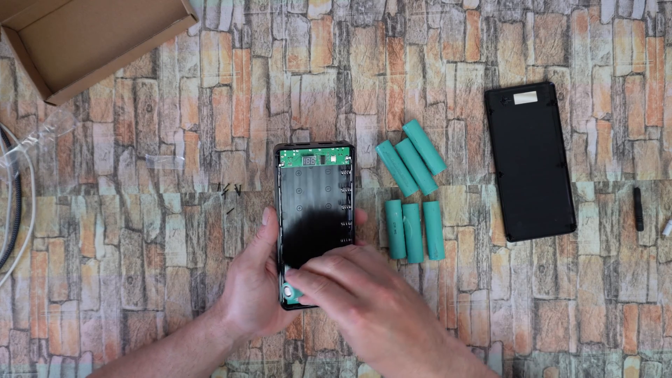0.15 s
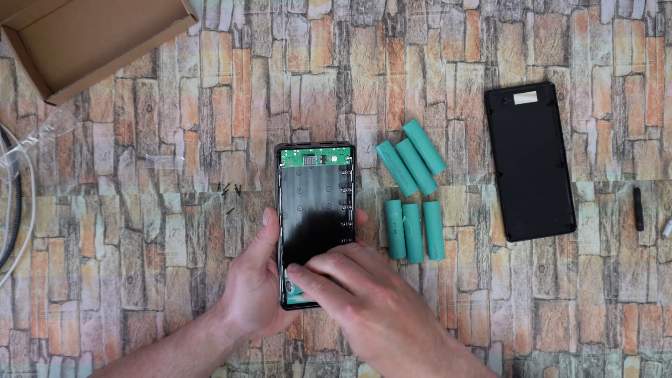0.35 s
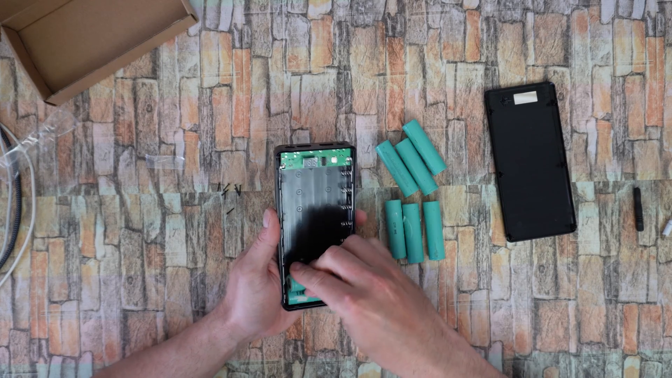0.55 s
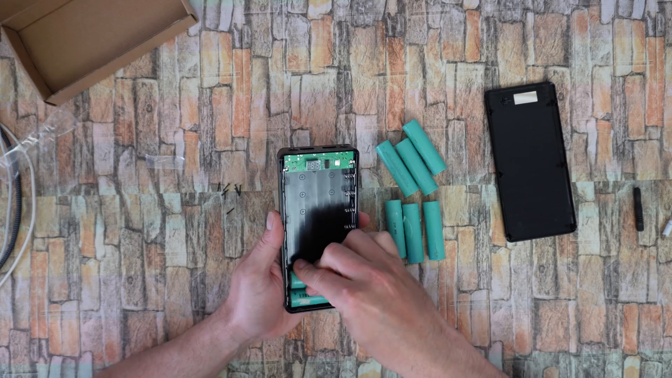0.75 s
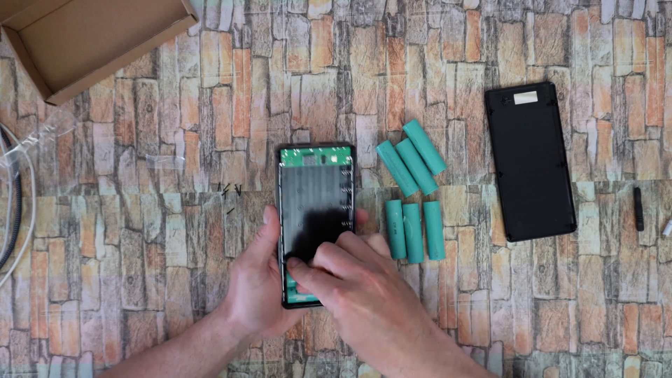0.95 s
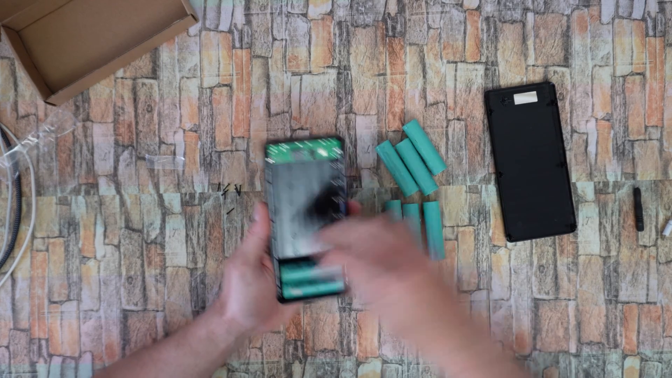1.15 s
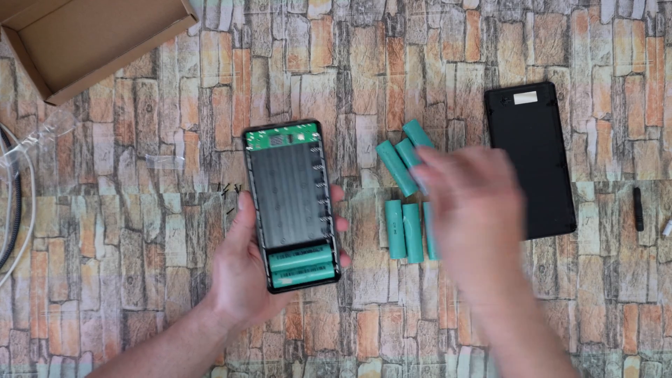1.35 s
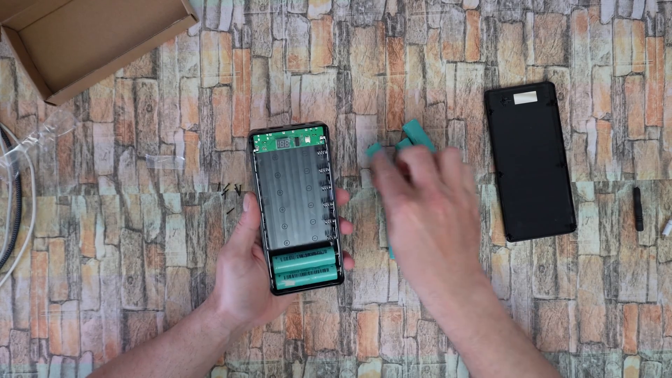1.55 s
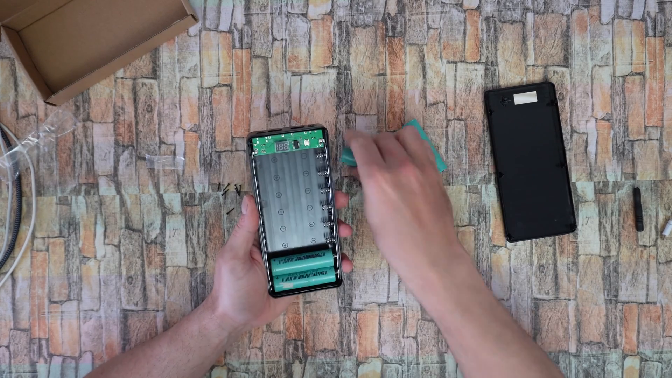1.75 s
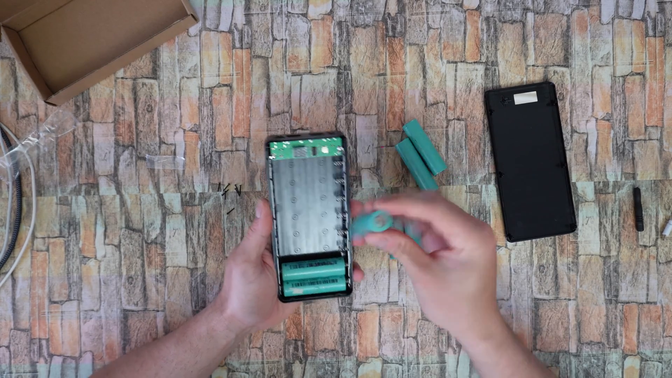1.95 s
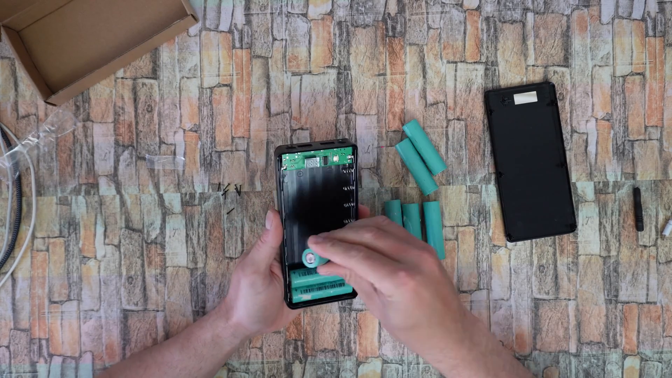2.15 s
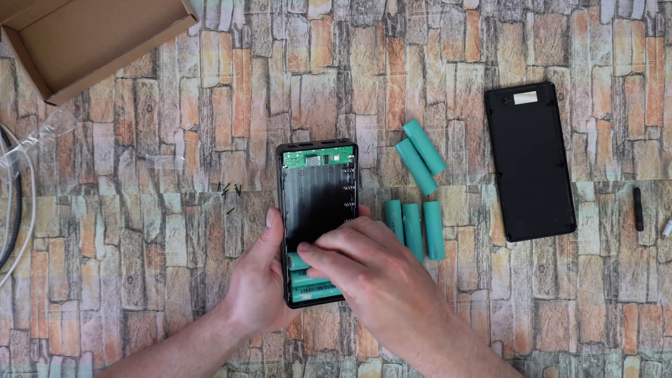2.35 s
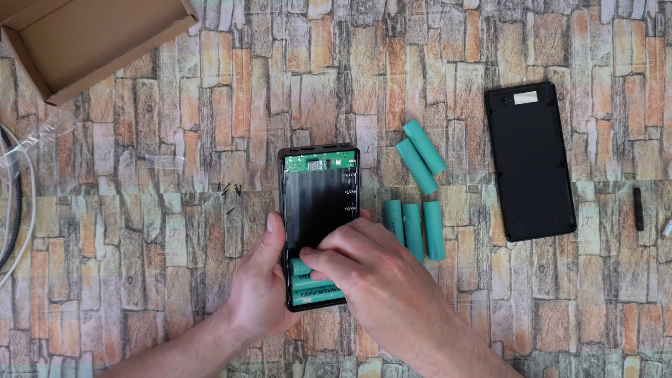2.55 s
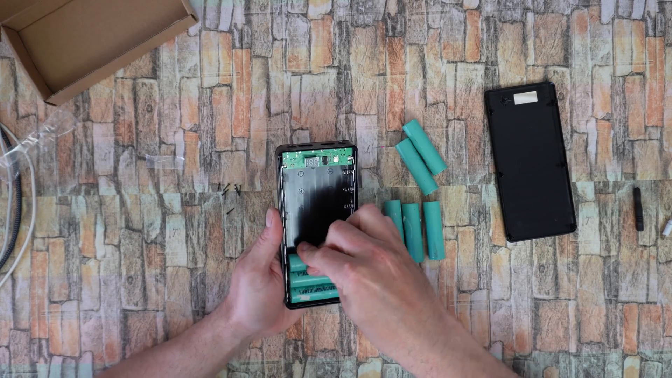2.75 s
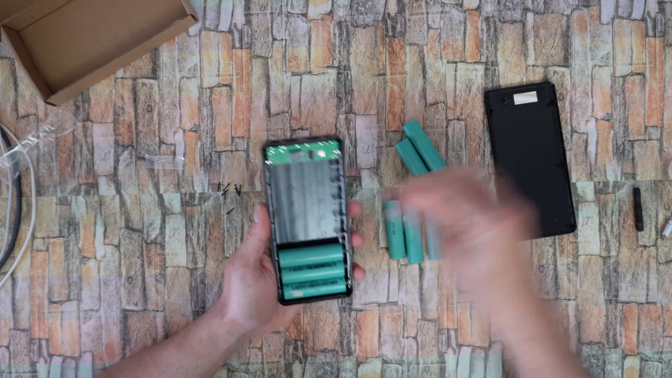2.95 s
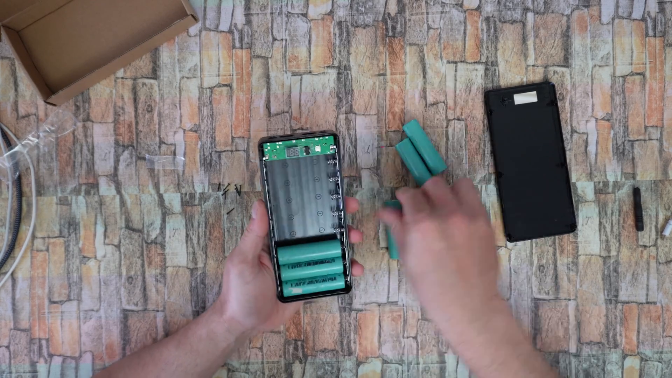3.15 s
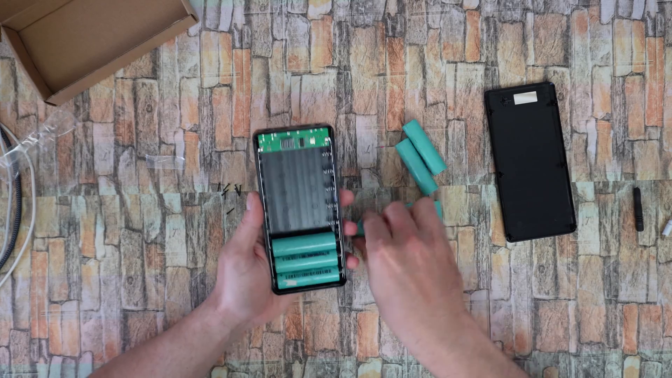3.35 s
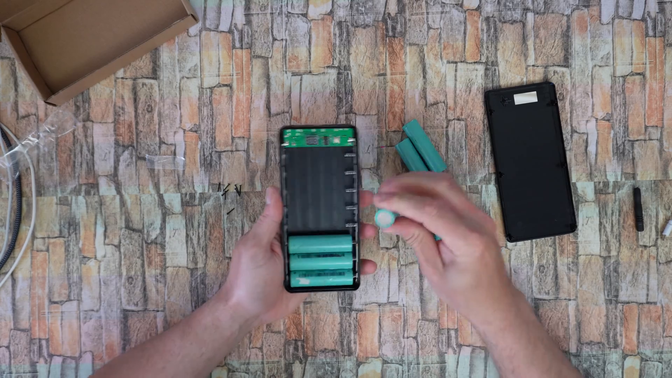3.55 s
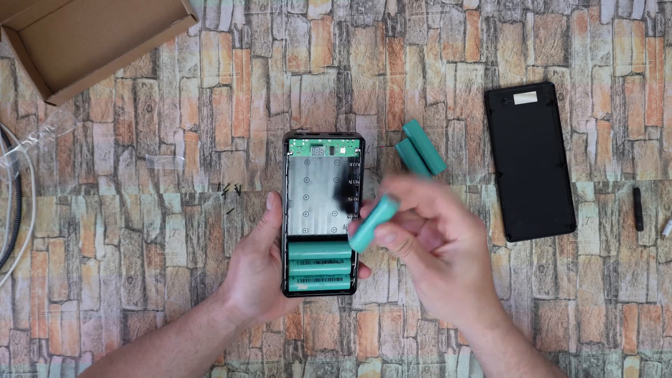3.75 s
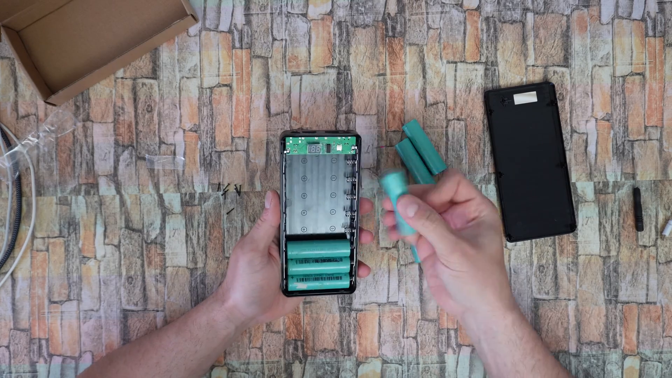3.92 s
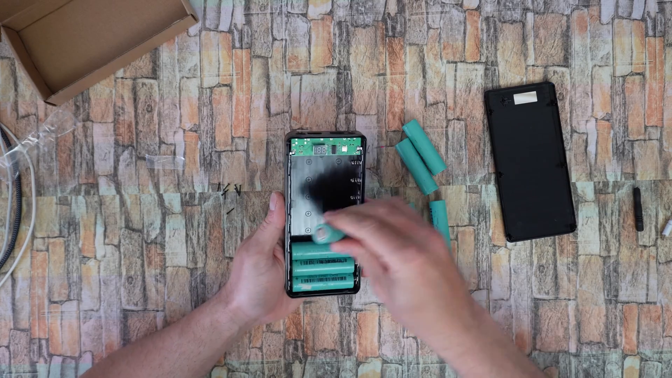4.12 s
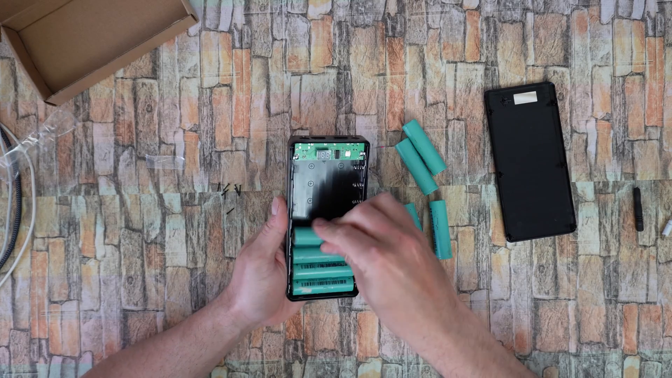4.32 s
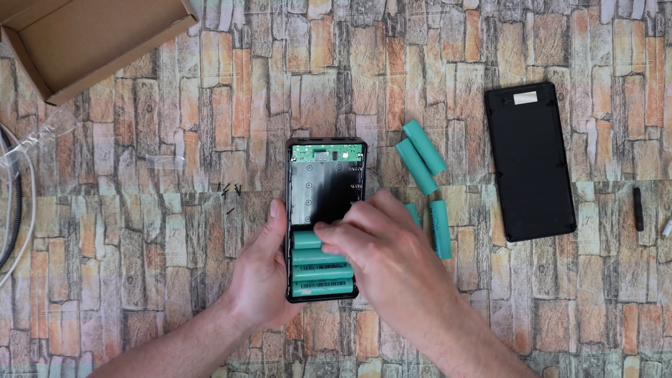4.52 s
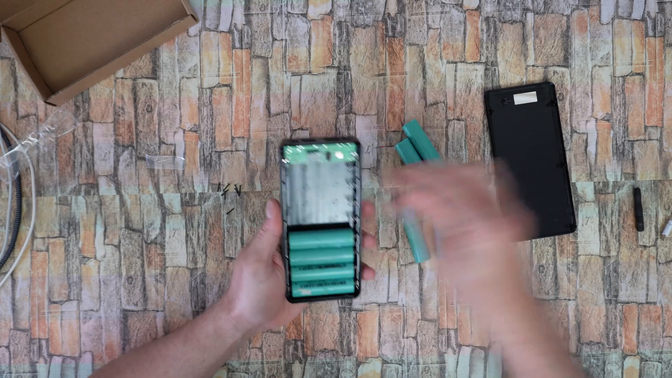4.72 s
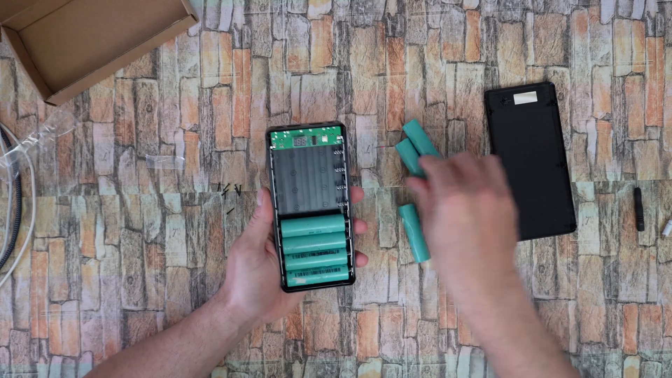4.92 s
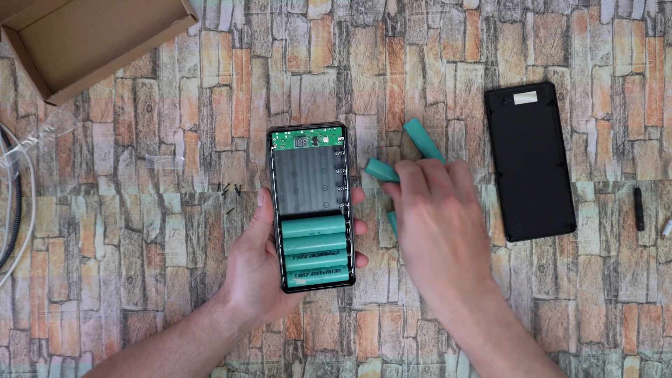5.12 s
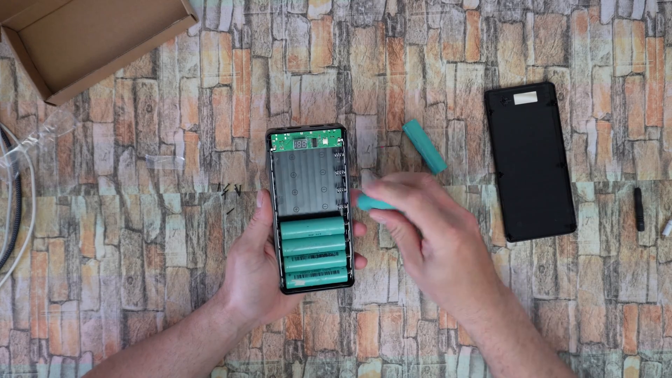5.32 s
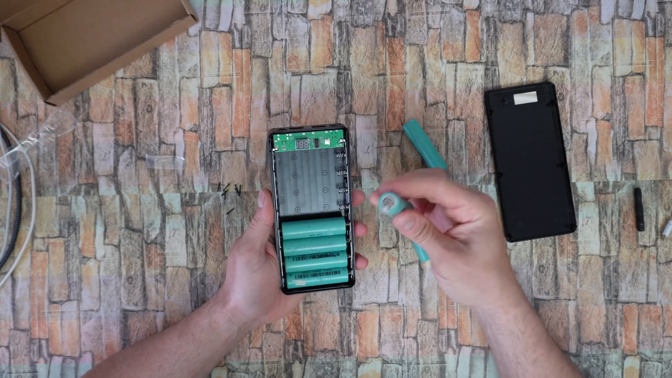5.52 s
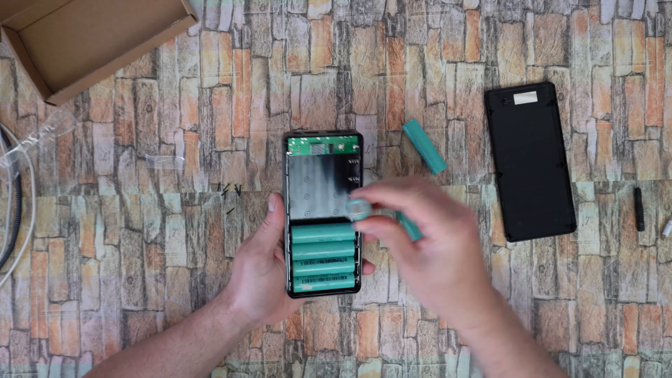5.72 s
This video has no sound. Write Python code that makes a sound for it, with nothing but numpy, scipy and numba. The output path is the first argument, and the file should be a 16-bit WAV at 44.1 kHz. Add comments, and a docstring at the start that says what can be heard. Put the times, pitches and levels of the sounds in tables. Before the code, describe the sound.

In a small bare room, heard from a microphone above a table, batteries snap into a plastic holder with a run of hard clicks and clacks. Another battery is picked up with faint knocks and a short roll, scrapes over a metal spring and clicks into place. This happens once more with loud snaps and a brief rattling buzz, then only soft knocks and finger rubs remain over faint room hiss.

```python
"""Battery cells snap one by one into a hand-held plastic case, under an overhead microphone in a small
bare room. Each snap is a short crack that rings the case and the air pocket beside the cell. Around the
snaps, cells knock and roll on the table, fingers rub their sleeves, springs scrape, seated cells buzz and
soft pushes thump. Hands and table top scatter the sound close by, the walls answer later, and faint room
tone lies underneath. A limiter behind the microphone holds down the loudest snaps."""
import sys
import numpy as np
from scipy import signal
from scipy.fft import rfft, irfft, next_fast_len
from scipy.io import wavfile
from scipy.ndimage import uniform_filter1d, minimum_filter1d
from numba import njit

SR = 44100
rng = np.random.default_rng(int(sys.argv[2]) if len(sys.argv) > 2 else 0)


def int16_out(signal):
    """Quantize to a 16-bit WAV file."""
    q = np.round(np.clip(np.atleast_2d(signal).T, -1, 1) * 32767)
    wavfile.write(sys.argv[1], SR, q.astype(np.int16))


N = 259308

# Spectrum of room noise and microphone hiss: f/Hz, relative density/dB
NOISE_FLOOR = [(12, -54.5), (20, -16.5), (33, -7.5), (65, -8.5), (181, -11), (226, -11), (344, -12),
               (455, -12), (710, -14), (1050, -16.5), (1170, -18.5), (1280, -18), (15700, -31.5)]
# Reverberation of the bare room: f/Hz, time to fall 60 dB/s
ROOM_T60 = [(300, 0.36), (1000, 0.35), (3000, 0.26), (7000, 0.43), (10000, 0.28), (14000, 0.51)]
# Soft pushes on case or table: t/s, level/dB, f/Hz
PUSHES = [(0.649, -18.5, 90), (1.926, -41, 64.6), (4.3164, -21, 301)]
# Modes of the table top: f/Hz, width/Hz, level/dB
TABLE_MODES = [(191, 28, -6.5), (349, 104, -0.5), (507, 19.3, 9), (607, 19, -1), (776, 160, -4),
               (1228, 41, -0.5), (1830, 2400, -16)]
# Cells tipped against the table top: t/s, peak level/dB
KNOCKS = [(1.551, -32), (1.601, -33.5), (1.665, -37), (3.167, -43), (3.201, -30.5), (3.261, -35.5),
          (3.284, -36), (4.904, -35), (4.999, -32.5), (5.478, -43.5)]
# Cells rolled and dragged on the table: t/s, hold/s, rumble level/dB, sleeve hiss against rumble/dB
ROLLS = [(1.55, 0.055, -54, 0.5), (1.63, 0.038, -45, -6), (3.172, .03, -52.5, -6),
         (3.201, 0.12, -45.5, -14), (4.968, 0.042, -40, -13), (5.179, .02, -58, -9)]
# Spectrum of skin sliding on a cell's sleeve: f/Hz, relative density/dB
SKIN_SPECTRUM = [(400, -35.5), (1000, -5.5), (2500, 4), (4700, 3), (7000, 4), (10000, -1), (15500, -22)]
# Fingers turning a cell: t/s, hold/s, level/dB
RUBS = [(1.14, 0.09, -56.5), (2.93, 0.0097, -53.5), (3.385, 0.019, -51), (3.426, 0.071, -44.5),
        (3.7, 0.15, -57.5), (5.315, 0.026, -70), (5.405, 0.062, -61.5), (5.685, 0.033, -56)]
# Modes of a contact spring: f/Hz, width/Hz, level/dB
SPRING_MODES = [(1990, 240, -4.5), (3800, 1200, -8.5), (5600, 330, -5), (5800, 560, -3.5),
                (8800, 1700, -11)]
# A cell end sliding over its spring: t/s, hold/s, level/dB
SCRAPES = [(1.07, 0.02, -49), (2.195, 0.027, -37.5), (2.39, 0.014, -45.5), (2.48, 0.035, -56.5),
           (2.86, 0.025, -56), (3.665, 0.014, -42.5), (4.163, 0.066, -37), (4.53, 0.0088, -41.5),
           (4.642, 0.013, -43)]
# Ringing modes of the plastic case and the metal cells in it:
# f/Hz, width/Hz, level when nearly empty/dB, level when loaded/dB
CASE_AND_CELL_MODES = [(390, 120, 8, -24), (440, 8.3, -11.5, -7.5), (726, 3, 14, 5), (773.5, 25, 6, 13),
                       (1091.4, 34, 12, -5), (1256, 15, 14, 5), (1490, 14, 8.5, -1.5), (1517, 22, 6, -10.5),
                       (1590, 120, 0.5, -9.5), (1798, 48, -6.5, 4), (1874, 61, 3.5, -0.5),
                       (2070, 36.2, 0, 10), (2410, 10, -25, 3.5), (2629, 74, 9.5, 10),
                       (2893, 150, -5.5, -0.5), (3230, 67, 13, -7), (3347, 66, 17.5, -26.5),
                       (3900, 140, 18, -5.5), (4224, 48, 18.5, -8.5), (4660, 127, 14, 6), (5383, 29, -5, 9),
                       (5720, 97, -5.5, 8.5), (6530, 540, -15, -3), (6890, 120, -2, 8.5),
                       (7840, 680, -19, 6.5), (9080, 230, -2.5, 14.5), (9170, 210, -2.5, 7.5),
                       (9290, 400, -16.5, 16), (12200, 2400, -3, -45.5)]
# Load in the case: t/s, fill (0 = nearly empty, 1 = loaded with cells)
CASE_FILL = [(1.2, 0.28), (2.1, 0.42), (2.8, 0.82), (4.1, 0.81)]
# Freshly seated cells buzzing: t/s, hold/s, level/dB
BUZZES = [(.646, 0.0026, -26.5), (2.692, 0.0067, -38.5), (4.318, 0.019, -16)]
# Clicks of cells against the case or the table top:
# t/s, level/dB, air pocket f/Hz, thud/dB, hollow/dB, tick/dB, to walls/dB
# Thud, hollow and tick are band levels against the body band; "to walls" is against the direct sound.
CLICKS = [(-0.03, 3, 1520, -13.5, -5.5, -13.5, -7), (0.1821, -20, 1300, -18, -6, -44, -16),
          (0.185, 1.5, 1410, -13.5, -6.5, -24, -5), (0.1923, -2.5, 1430, -16.5, 8, -43, -18.5),
          (0.2065, -9, 1590, -21, 7, -34, -30), (0.3044, -6, 1450, -10.5, -5.5, -23, -1),
          (0.3088, -4.5, 1440, 0.5, 16, -31, -21), (0.4567, -27.5, 2940, -5.5, -0.5, -10.5, 10),
          (0.4793, -17, 2870, -10, 2, -4.5, -7.5), (0.6453, 6, 1860, -7.5, -0.5, -6, -8),
          (0.6826, -17.5, 1844, -11, -6, -14.5, 10.5), (0.7983, -23, 1260, -3, -7.5, -13, 3.5),
          (0.83, -6, 1725, -22, -7.5, -27, -8), (1.0538, -35.5, 4250, -14, -2, -23, 7),
          (1.062, -28.5, 1220, -0.5, 13, -41, -1.5), (1.0905, -25.5, 1220, -0.5, -3, -9, -19),
          (1.5507, -36, 1310, -2, 0, -22, 11), (2.1834, -18.5, 1820, -56, -14, -25, -0.5),
          (2.205, -33, 1830, -20, -20, -12, -27), (2.2425, -27.5, 1940, -9, -3, -1.5, 10.5),
          (2.264, -13.5, 1960, -19, 0.5, -7.5, -27), (2.2678, -10.5, 1930, -8, -5, -23, -13),
          (2.2793, -12, 1930, -18, 3, -12.5, -27), (2.3753, -25.5, 1300, -5, -5.5, -9, -9),
          (2.44, -24, 2100, -14, -3, -14, -2.5), (2.515, -44.5, 2140, -12, -23, 4, 9),
          (2.5558, -33, 2140, -16, -10, -12, 0.5), (2.5772, -23, 2400, -33, 0.5, -10, -3.5),
          (2.5973, -22, 2150, -20, -4.5, -15, -20), (2.6065, -23, 2520, -21, -27, -7, -18),
          (2.6921, -2.5, 2480, -20, -28, 9, -3.5), (2.753, -7.5, 2060, -20.5, -10, 3.5, -12.5),
          (2.8693, -27, 2900, -24, -7, -28, -12), (3.1997, -27, 9400, -13, -18, -1, -5),
          (3.357, -42.5, 1920, 2, -10, -7, 12), (3.3936, -39, 2360, -14, -21, -16, -15),
          (3.432, -35, 4100, 12, 7, 8, 6.5), (3.6117, -48, 2520, -7, 1, 2, 9),
          (3.669, -37.5, 2700, -19, -8, 3, 2), (3.673, -30.5, 2600, -11, -8, -11, -14),
          (3.705, -43, 2680, -15, -25, -20, -4.5), (4.065, -46.5, 895, 7, -3, 4, -9),
          (4.143, -16, 2270, -45, -14, -23, 2), (4.1608, -26, 3360, -37, -23, 4, 8),
          (4.1875, -4, 2400, -24, -6, -18, -10), (4.1924, -6, 2800, -28, -3, -15.5, -12),
          (4.2416, -3, 2440, -18.5, -3, -12.5, 3.5), (4.2747, -9, 2350, -36.5, -12, -9, 0.5),
          (4.3167, 3.5, 2770, -28, -1, -3, -0.5), (4.4075, -11.5, 2840, -36.5, -18, -27, -6),
          (4.5411, -9, 2230, -31, -4, 7, -7.5), (4.6358, -26.5, 2500, -9, -3, -34, -17),
          (4.652, -24, 5260, -14, 23, 27, -7), (4.9053, -40, 1280, 4, 10, 5, 5),
          (5.3209, -42, 3690, 7, -3, 15, 3), (5.8636, -36.5, 1750, -36, -5, -18, 12)]

# Bands of a click: thud, hollow, body, clack, tick
BAND_HZ, BAND_WIDTH_HZ = [550, 1250, 2400, 5000, 9500], [600, 700, 1900, 3500, 6000]
LEAD = 4096  # samples played before time zero


def undb(db):
    """Decibels to amplitude."""
    return 10 ** (np.asarray(db) / 20)


def unit(x):
    """Scale to rms 1."""
    return x / np.sqrt(np.mean(x ** 2))


def bins(size):
    """FFT frequencies in Hz, floored at 1."""
    return np.maximum(np.arange(size // 2 + 1) * SR / size, 1)


def curve(points, hz):
    """Interpolate (f/Hz, value) points on a log-frequency axis."""
    freqs, values = np.transpose(points)
    return np.interp(np.log(hz), np.log(freqs), values)


def resonances(modes, hz):
    """Complex response of (f/Hz, width/Hz, level/dB) modes; neighbours move in opposite senses."""
    return sum((-1) ** k * undb(db) * 1j * hz * width / (f * f - hz * hz + 1j * hz * width)
               for k, (f, width, db) in enumerate(modes))


def minimum_phase(db):
    """Causal response with this gain curve."""
    cepstrum = irfft(db * np.log(10) / 20)
    half = len(cepstrum) // 2
    cepstrum[1:half] *= 2
    cepstrum[half + 1:] = 0
    return np.exp(rfft(cepstrum))


def wander(samples):
    """Slow random motion, smoothed over this many samples; rms 1."""
    return unit(uniform_filter1d(uniform_filter1d(rng.standard_normal(N), samples), samples))


def grit(response, spread_db):
    """Dense slips of uneven size through a frequency response; rms 1."""
    size = next_fast_len(N)
    slips = rng.standard_normal(size) * undb(spread_db * np.minimum(rng.exponential(size=size), 5))
    return unit(irfft(rfft(slips) * response(bins(size)), size)[:N])


def envelope(start, hold, db, rise_s, fade_db_s):
    """Gain of one movement: it swells, holds and fades."""
    age = np.arange(N) / SR - start
    return np.clip(age / rise_s, 0, 1) ** 2 * undb(db - fade_db_s * np.maximum(age - rise_s - hold, 0))


def room_tone(hum_hz=51, whine_hz=7450):
    """Quiet room noise and microphone hiss, with a hum and a thin whine that waver together."""
    t = np.arange(N) / SR
    top_hz = NOISE_FLOOR[-1][0]
    hiss = undb(-56) * grit(lambda hz: undb(curve(NOISE_FLOOR, hz)) * (hz < top_hz), spread_db=0)
    waver = wander(3000)
    tones = sum(undb(db + 2.5 * waver) * np.sin(2 * np.pi * hz * t + 0.47 * waver)
                for hz, db in ((hum_hz, -71.5), (whine_hz, -83)))
    return hiss + np.sqrt(2) * tones


def room_echoes(sound, gap_s=0.006, rise_s=0.016, walls_db=-6.5, nearby_s=0.007, nearby_db=-9):
    """Hands and table top scatter close by; after a gap, diffuse echoes build up from the walls."""
    size = 32768
    t, hz = np.arange(size) / SR, bins(size)
    late = np.maximum(t - gap_s, 0)
    # the highest treble beams upward and hardly reaches the walls
    noise = rfft(rng.standard_normal(size)) / (1 + (hz / 13500) ** 4)
    tail = 0
    for centre_hz in 2 ** np.arange(5, 15.):
        octave = np.clip(1 - np.abs(np.log2(hz / centre_hz)), 0, 1)
        tail += irfft(noise * octave) * undb(-60 * late / curve(ROOM_T60, centre_hz))
    tail *= 1 - np.exp(-late / rise_s)
    nearby = rng.standard_normal(size) * np.exp(-t / nearby_s)
    echoes = undb(walls_db) * tail / np.linalg.norm(tail)
    echoes += undb(nearby_db) * nearby / np.linalg.norm(nearby)
    return signal.fftconvolve(sound, echoes)[:len(sound)]


def thumps():
    """Each soft push gives case or table one heavily damped low swing."""
    t, out = np.arange(N) / SR, 0
    for start, db, hz in PUSHES:
        phase = 2 * np.pi * hz * np.maximum(t - start, 0)
        out += 2 * undb(db) * np.sin(phase) * np.exp(-phase / 0.69)
    return out


def table_knocks(contact_s=0.00023):
    """A tipped cell gives the table a short push that rings its modes."""
    size = 8192
    hz, out = bins(size), np.zeros(N + size)
    ring = irfft(resonances(TABLE_MODES, hz) / (1 + 1j * hz * contact_s) ** 2)
    ring /= np.max(np.abs(ring))
    for start, db in KNOCKS:
        i = int(start * SR)
        out[i:i + size] += undb(db) * ring
    return out[:N]


def skin_hiss(spread_db):
    """Skin slides over a cell's sleeve in tiny slips."""
    return grit(lambda hz: undb(curve(SKIN_SPECTRUM, hz)), spread_db)


def rolling_cells(bump_s=0.015, bump_db=2.5):
    """A rolling cell bumps along unevenly and drives the table's modes while its sleeve hisses."""
    rumble = grit(lambda hz: resonances(TABLE_MODES, hz) + undb(-19) * (hz > 200) * (hz < 2500),
                  spread_db=3.7)
    sleeve = skin_hiss(spread_db=2.6)
    rumble = unit(rumble * undb(bump_db * wander(int(bump_s * SR))))
    return sum(envelope(start, hold, db, rise_s=0.0075, fade_db_s=275) * (rumble + undb(hiss_db) * sleeve)
               for start, hold, db, hiss_db in ROLLS)


def finger_rubs():
    """Fingers hiss on the sleeve as they turn a cell."""
    gain = sum(envelope(*rub, rise_s=0.014, fade_db_s=359) for rub in RUBS)
    return gain * skin_hiss(spread_db=2.0)


def spring_scrapes():
    """A sliding cell end chatters on its spring and rings it."""
    gain = sum(envelope(*scrape, rise_s=0.0043, fade_db_s=1196.5) for scrape in SCRAPES)
    return gain * grit(lambda hz: resonances(SPRING_MODES, hz) / (1 + (hz / 9000) ** 4), spread_db=0.71)


def fill_at(seconds):
    """How loaded the case is at this moment, 0 to 1."""
    return np.interp(seconds, *np.transpose(CASE_FILL))


def case_and_cells(fill, hz, crack_db=0.5):
    """Ring of case and cells plus the bare crack; a load stiffens and damps the case, so modes trade."""
    modes = [(f, width, empty + fill * (full - empty)) for f, width, empty, full in CASE_AND_CELL_MODES]
    return resonances(modes, hz) + undb(crack_db)


def cell_buzzes():
    """A freshly seated cell buzzes against its neighbours: dense small impacts ring case and cells."""
    out = 0
    for start, hold, db in BUZZES:
        fill = fill_at(start)
        top_hz = 5500 + 5500 * fill  # steel on steel is brighter than steel on plastic

        def ring(hz):
            above_bass = case_and_cells(fill, hz) / (1 + (1100 / hz) ** 3)
            return above_bass / (1 + (hz / top_hz) ** (7.5 - 4.4 * fill))

        out += envelope(start, hold, db, rise_s=0.0093, fade_db_s=424) * grit(ring, spread_db=1.8)
    return out


def contact_colour(thud_db, hollow_db, tick_db, hz):
    """Response of one contact: five bands, falling away below the thud and above the tick."""
    clack_db = 4.5 + 0.46 * tick_db  # the clack follows the tick part of the way
    density_db = np.array([thud_db, hollow_db, 0, clack_db, tick_db]) - 10 * np.log10(BAND_WIDTH_HZ)
    bass_db = density_db[0] - 17.5
    top_db = density_db[-1] - 21 + 0.34 * (tick_db - clack_db)
    return minimum_phase(curve([(100, bass_db), *zip(BAND_HZ, density_db), (17000, top_db)], hz))


def contact_all_round(moments, hz, contact_s):
    """All-pass: summed over all directions a contact is flat, each band struck at its own moment."""
    delay_s = np.interp(hz, np.linspace(0, SR / 2, len(moments)), moments ** 2) * contact_s
    return np.exp(-2j * np.pi * np.cumsum(delay_s) * SR / (2 * len(hz) - 2))


def cell_clicks(contact_s=0.00212, pocket_width=0.15, pocket_db=2.5):
    """Cells hit case or table top, each a crack and a ring; returns sound to microphone and walls."""
    size = 16384
    hz, out = bins(size), np.zeros((2, N + LEAD + size))
    age = np.arange(size) / SR / (contact_s / 2)  # in half contact times
    fade = np.cos(np.linspace(0, np.pi / 2, size)) ** 2
    noises, timings = rng.standard_normal((len(CLICKS), size)), rng.random((len(CLICKS), 48))
    for row, noise, moments in zip(CLICKS, noises, timings):
        start, db, pocket_hz, thud_db, hollow_db, tick_db, walls_db = row
        to_mic = rfft(noise * np.sqrt(age) * np.exp(-age ** 2))  # a rattle of tiny impacts
        to_walls = contact_all_round(moments, hz, contact_s)
        colour = contact_colour(thud_db, hollow_db, tick_db, hz)
        ring = case_and_cells(fill_at(start), hz)
        pocket = 0.5 + resonances([(pocket_hz, pocket_width * pocket_hz, pocket_db)], hz)
        click = irfft(np.array([to_mic, to_walls]) * colour * ring * pocket) * fade
        # the strength of a click sets its energy, as if spent in 4 ms
        rms = np.sqrt(np.sum(click ** 2, axis=1, keepdims=True) / (0.004 * SR))
        click *= undb(db) / (2 * rms)
        click[1] *= undb(walls_db)
        i = int(start * SR) + LEAD
        out[:, i:i + size] += click
    return out[:, :N + LEAD]


def scene():
    """At the microphone above the table: direct clicks and handling, their echoes, thumps, room tone."""
    direct, to_walls = cell_clicks()
    handling = rolling_cells() + finger_rubs() + spring_scrapes() + cell_buzzes() + table_knocks()
    to_walls[LEAD:] += undb(-8) * handling  # the hands shield small movements from the walls
    clicks_and_echoes = (direct + room_echoes(to_walls))[LEAD:]
    return (clicks_and_echoes + handling + thumps() + room_tone())[None]


@njit
def recover(allowed, release):
    """Limiter gain follows a drop at once and creeps back afterwards."""
    gain, current = np.empty(len(allowed)), 1.
    for i in range(len(allowed)):
        current = min(allowed[i], current / release)
        gain[i] = current
    return gain


def record(dry, ceiling_db=-0.8, window_samples=33, release_s=0.011, top_hz=16930):
    """The microphone's limiter sees peaks a moment ahead and eases the gain down; the top is cut."""
    allowed = np.minimum(1, undb(ceiling_db) / (np.abs(dry[0]) + 1e-9))
    gain = recover(minimum_filter1d(allowed, window_samples), np.exp(-1 / (release_s * SR)))
    limited = dry[0] * uniform_filter1d(gain, window_samples)
    lowpass = signal.ellip(10, 0.2, 80, top_hz, fs=SR, output="sos")
    return signal.sosfilt(lowpass, limited)[None]


dry = scene()
out = record(dry)
int16_out(out)
```